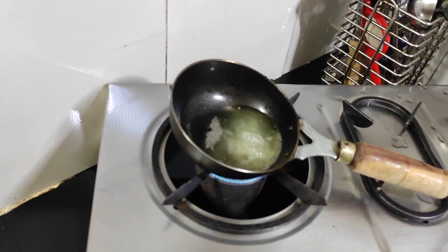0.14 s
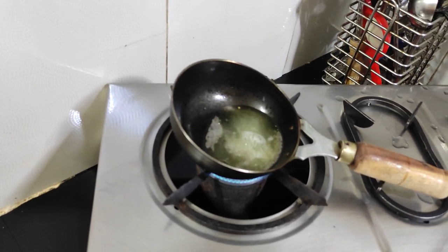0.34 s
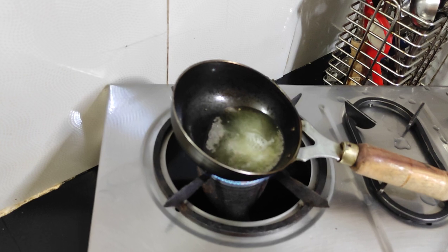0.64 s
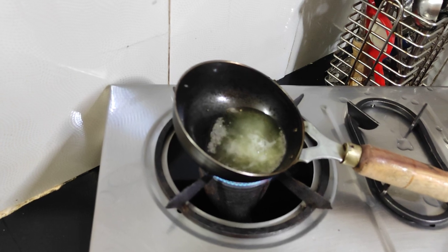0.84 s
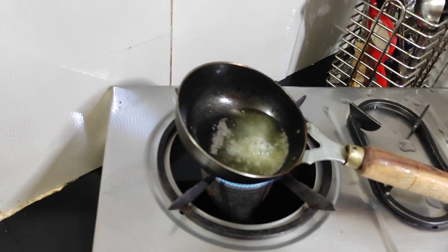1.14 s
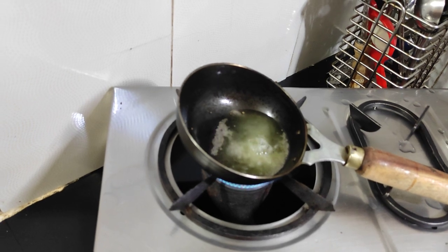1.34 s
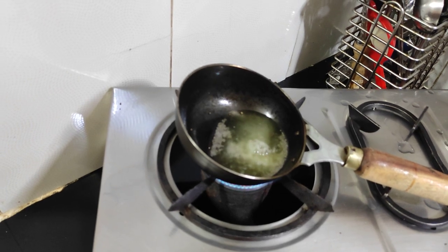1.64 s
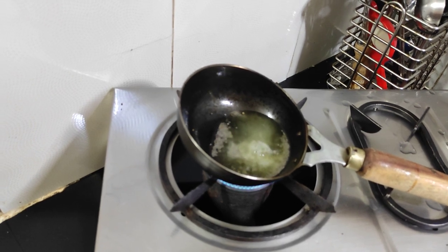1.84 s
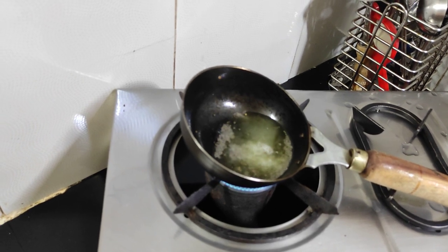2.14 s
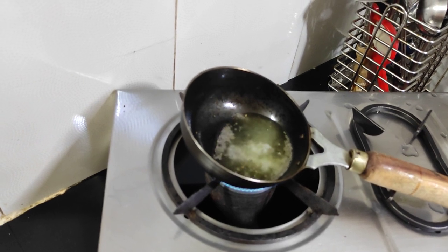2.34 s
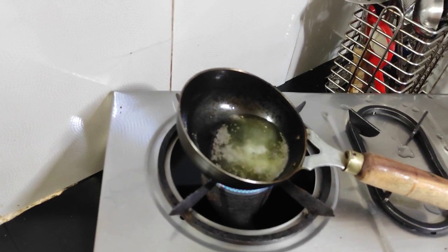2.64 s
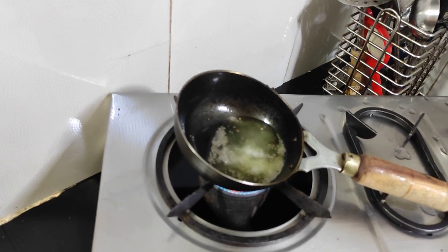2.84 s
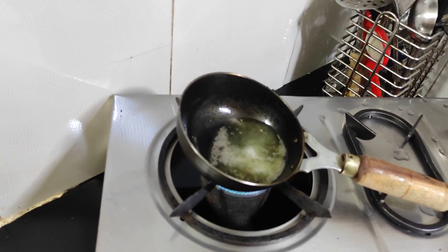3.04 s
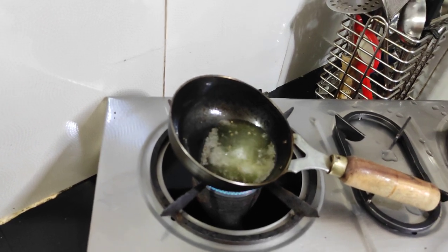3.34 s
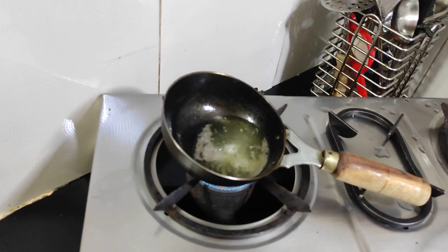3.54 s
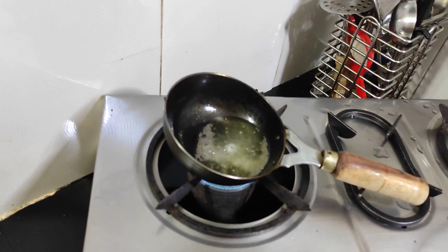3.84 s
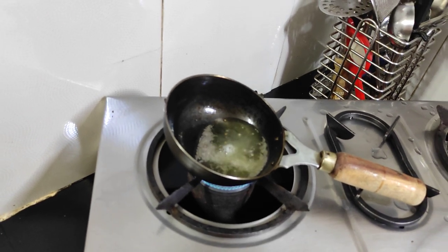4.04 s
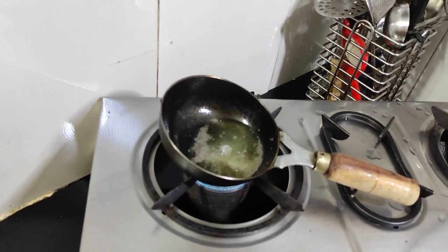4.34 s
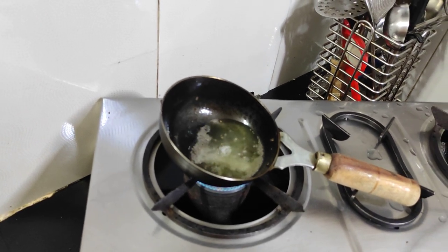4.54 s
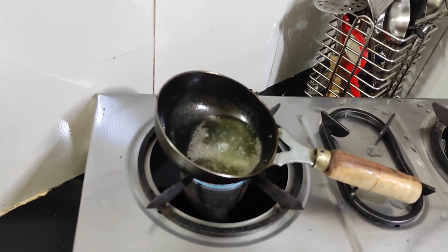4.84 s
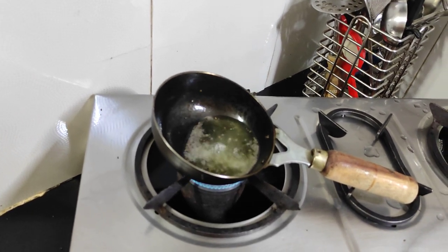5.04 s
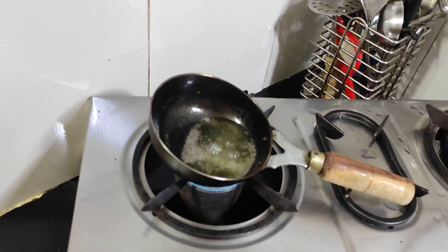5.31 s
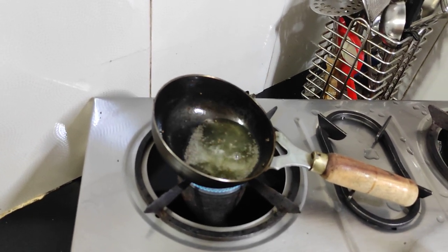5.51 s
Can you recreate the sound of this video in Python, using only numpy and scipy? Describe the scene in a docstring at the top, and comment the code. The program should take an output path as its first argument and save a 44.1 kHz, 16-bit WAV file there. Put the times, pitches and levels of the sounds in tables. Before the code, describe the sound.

Close stereo recording of seeds bursting in a small pan of hot oil on a gas burner. Sharp dry snaps come sparsely at first, then mix with duller, wet, pitched pops and crowd together toward the end. Quiet fizz grows beneath, with a soft steady flame rush. Tiled walls return short, bright reflections.

```python
"""Seeds bursting in hot oil

Seeds burst in a small pan on a gas burner, close to two microphones in a tiled kitchen corner.
Dry husks crack brightly: a sharp click. Moist seeds splutter: a duller click that rings a steam pocket.
Each burst is thrown back by pan, tiles and room; listed thumps are jolts of the microphones.
Fizz, made of many tiny bursts, and the flame, made of coloured noise, lie underneath."""
import sys
import numpy as np
from scipy import signal
from scipy.fft import rfft, irfft, next_fast_len
from scipy.io import wavfile

SR = 44100
rng = np.random.default_rng(int(sys.argv[2]) if len(sys.argv) > 2 else 0)


def inscribe(sig):
    """Save sig as 16-bit PCM at rate SR to the path in sys.argv[1].

    A 1-D sig is mono; a 2-D sig holds one channel per row.
    Samples are clipped to [-1, 1] before scaling.
    """
    pcm = np.round(np.clip(np.atleast_2d(sig).T, -1, 1) * 32767)
    wavfile.write(sys.argv[1], SR, pcm.astype(np.int16))


N = 250211  # length in samples

# rush of the gas flame, relative: pitch_hz, level_db
FLAME_COLOUR = [(20, -1), (45, -1.5), (80, -1), (140, -1), (290, -6.5), (380, -3.5), (520, -6),
                (650, -10.5), (1000, -10.5), (2000, -17.5), (6000, -24), (13500, -26), (15000, -57)]
# resonances of the burner and the hollow hob: pitch_hz, width_hz, level_db
BURNER_MODES = [(115.4, 3.1, 9), (203.4, 15, -2.5), (283, 13.3, 6.5), (380, 27, -17.5), (498.4, 2.8, 10.5),
                (673, 9.8, 1.5)]
# kitchen reverberation: band_hz, level_db, time_to_fall_60_db_s
KITCHEN_BANDS = [(300, -14.5, 1), (1620, -2.5, 0.4), (2700, -3.5, 0.44), (5460, -4, 0.37),
                 (8800, -7.5, 0.38), (14000, -6, 0.27)]
# jolts that overload the microphones, before a shared gain: start_s, left_db, right_db
MIC_THUMPS = [(0.2226, -29, -37), (0.5513, -30.5, -37), (0.9881, -32, -46), (1.1639, -18.5, -4.5),
              (1.2774, -21.5, -28), (1.4931, -21, -46), (1.7702, -21, -35), (2.347, -30, -49),
              (2.735, -17, -38), (3.062, -32, -40), (3.8943, -27, -36), (4.2633, -29.5, -38),
              (5.6338, -18.5, -35)]
# right microphone minus left: pitch_hz, difference_db
RIGHT_MINUS_LEFT = [(900, 3.5), (1800, 2), (3000, 3.5), (4400, 1.5), (6000, 5), (7100, 4), (8400, -4),
                    (9500, -4), (11500, 1), (14000, 0)]
# faint modes of the oil-damped pan: pitch_hz, width_hz, level_db
PAN_RESONANCES = [(1443, 45, -7), (1848, 45, -4), (2464, 160, -11), (2810, 45, -13.5), (6770, 120, -4)]
# basic colour of a burst: pitch_hz, level_db
BURST_COLOUR = [(150, -20), (600, -22), (900, -17), (1300, -10.5), (2200, -11.5), (3200, -5), (4800, -4.5),
                (7000, -2), (8700, 0), (10500, -5), (12500, -8.5), (14200, -11), (15500, -42)]
# echoes from hob and tiles, before treble loss: delay_s, left_db, right_db
TILE_ECHOES = [(.0024, -4, -14), (.0038, -21, -11.5), (.0083, -21.5, -14.5)]
# dry husks that crack at the surface: start_s, level_db, brightness_db_per_octave
DRY_CRACKS = [(-.02, 2.5, -1), (0.2227, 0.5, 0), (0.3377, -3.5, -0.5), (0.5514, -2, 1), (0.5794, -1.5, 0),
              (.9881, 3.5, 0.5), (1.1654, 5.5, 0), (1.2767, 6.5, 0.5), (1.4931, -0.5, -1), (1.7708, 3.5, 1),
              (1.8423, 4.5, 0), (1.849, -4, -2), (1.9796, 3, -1), (2.347, -1, 0), (2.4284, -0.5, -1),
              (2.6811, 4.5, -1), (2.7353, -0.5, 1.5), (2.7873, 2.5, 1), (3.062, 2.5, 1),
              (3.1924, -8.5, 2.5), (3.2472, -0.5, 2.5), (3.3055, -5, 1.5), (3.5845, -0.5, -1.5),
              (3.6144, -1, 1), (3.657, -3, 2), (3.702, 3, 0.5), (3.7978, -1, -1.5), (3.969, -3, -0.5),
              (4.022, -7, 1), (4.1003, -9.5, -2.5), (4.2634, -1.5, 0.5), (4.3157, -2, -0.5),
              (4.3854, -4, -1), (4.4089, -9, -3), (4.4246, -1.5, -0.5), (4.5075, -4.5, -1.5),
              (4.5855, 2, 0), (4.73, -2, 2.5), (4.8267, 1.5, 3), (4.8472, -3.5, 2), (4.9524, -7.5, -1),
              (4.995, 3, -1), (5.236, 1.5, -0.5), (5.336, 2, -1), (5.4218, -3.5, -3), (5.441, -3, 1),
              (5.5104, 2, -1.5), (5.519, 3.5, -0.5)]
# moist seeds that splutter under the oil: start_s, level_db, pocket_hz, ring_db
MOIST_SPLUTTERS = [(.4432, -19, 4750, 2), (0.482, -8, 5600, 1), (0.6952, -0.5, 7500, 14.5),
                   (0.7165, 0.5, 4240, -5), (0.8332, .5, 6200, 1.5), (0.879, -12, 3330, -11),
                   (1.357, -4.5, 8600, 5.5), (1.6118, -14, 5700, 30), (1.8915, -1, 6700, 5),
                   (2.0601, 6.5, 6450, 1), (2.0682, -5, 7050, 9), (2.1489, -1, 7000, 0),
                   (2.2979, -12.5, 3270, 4), (2.4179, -3.5, 4060, 9), (2.5023, -0.5, 3430, 16),
                   (2.5836, -10.5, 6360, -1), (2.7538, 3.5, 2970, 7.5), (2.912, -11, 3530, 11),
                   (2.9399, -4.5, 7100, 8), (3.132, -8.5, 4140, 1), (3.2091, -2.5, 3460, 15),
                   (3.276, -8, 3460, 3), (3.373, 2, 2900, 13), (3.5518, 2.5, 2560, 25),
                   (3.8943, 3, 9900, 7), (4.3977, -1, 6630, -8), (4.4746, -1.5, 2630, 13),
                   (4.5615, -1.5, 4230, 4), (4.571, -1, 3400, 6), (4.6073, 0.5, 4200, 27),
                   (4.629, 2, 6540, 5), (4.6416, 5.5, 9050, 4), (4.6514, 0.5, 9200, -8),
                   (4.7418, 0.5, 3930, 3), (4.789, -9, 3600, 4), (4.9191, -8, 5300, 5),
                   (4.9978, -0.5, 6850, 17), (5.0329, 1.5, 2630, 20), (5.1252, -2.5, 2850, 5),
                   (5.216, -2, 5430, 22), (5.221, 4.5, 3120, 11), (5.3147, -2.5, 2270, 1),
                   (5.493, -7, 4800, 10), (5.558, 0, 5400, 16), (5.5747, -2.5, 2920, 19),
                   (5.6326, -3, 9900, 7)]

FLAME_DB = -52.5  # rms
TOP_HZ = 15800  # upper limit of the whole sound
SIZE = 1024  # samples in one burst
LEAD = 4410  # samples of run-up before the scene begins
# share of a burst that scatters in the oil and off the pan wall
PAN_WALL_DB = -2.8
# a crack rings only faintly, at a pitch of its own
CRACK_POCKET_HZ, CRACK_POCKET_OCTAVES, CRACK_RING_DB = 6440, 0.48, -10
# oil muffles a splutter, the more so the more it rings
OIL_DB_PER_OCTAVE, OIL_DB_PER_OCTAVE_PER_RING_DB = -3, -0.09
# the seeds lie scattered over the pan, a little to the left (left minus right)
PAN_DB, PAN_SPREAD_DB = 1.55, 0.67
# where treble rolls off, in the open and under oil; brightness tilts it from the knee up
OPEN_TOP_HZ, OIL_TOP_HZ, KNEE_HZ = 16700, 11200, 2310


def undb(db):
    """Turn decibels into gain."""
    return 10 ** (np.asarray(db) / 20)


def level(x, db):
    """Set the rms level, a measure of average strength."""
    return x * undb(db) / np.sqrt(np.mean(x ** 2))


def freqs(size):
    """List the frequencies of a transform in Hz, never below 1."""
    return np.maximum(np.fft.rfftfreq(size, 1 / SR), 1)


def colour(points, f):
    """Join (Hz, dB) points with lines on a log-frequency axis."""
    hz, db = np.transpose(points)
    return np.interp(np.log(f), np.log(hz), db)


def causal(db):
    """Find the quickest response with this gain curve: a sharp front, then a tail."""
    cepstrum = irfft(np.log(undb(db)))
    half = len(cepstrum) // 2
    # fold the backward half onto the forward half
    cepstrum[1:half] *= 2
    cepstrum[half + 1:] = 0
    return np.exp(rfft(cepstrum))


def resonance(f, hz, q):
    """Response of one damped resonance, gain 1 at its centre; higher q rings longer."""
    return 1 / (1 + 1j * q * (f / hz - hz / f))


def ringing_body(f, modes):
    """An object passes the sound straight on and adds its own resonances."""
    return 1 + sum(undb(db) * resonance(f, hz, hz / width) for hz, width, db in modes)


def add(track, s, sound):
    """Mix a stereo sound into a track that starts LEAD samples early."""
    start = max(int(round(s * SR)) + LEAD, 0)
    part = track[:, start:start + sound.shape[1]]
    part += sound[:, :part.shape[1]]


def flame(alike_hz=750, bass_likeness=0.64):
    """The steady rush of the flame rings the burner; its bass is more alike in both microphones."""
    f = freqs(N)
    body = ringing_body(f, BURNER_MODES)
    likeness = min(bass_likeness, .98) / (1 + (f / alike_hz) ** 4)
    noise = rfft(rng.standard_normal((2, N)))
    # mid is shared by both sides; side has opposite signs
    mid, side = noise * np.sqrt([1 + likeness, 1 - likeness])
    stereo = mid + np.array([[1], [-1]]) * side
    rush = irfft(stereo * body * undb(colour(FLAME_COLOUR, f)), N)
    return level(rush, FLAME_DB)


def kitchen(x, early_db=-10, early_s=0.0013, far_wall_db=-12, far_wall_s=0.027, far_decay_s=0.0049):
    """Scatter from the nearby corner, a cluster from the far walls, then a tail of tiled walls."""
    size = int(.7 * SR)
    t, f = np.arange(size) / SR, freqs(size)
    hz, db, t60 = np.transpose(KITCHEN_BANDS)

    def cloud(start_s, decay_s):
        """Power of a swarm of echoes, summing to 1."""
        power = np.exp(-2 * t / decay_s) * (t > start_s)
        return power / power.sum()

    corner = undb(early_db) ** 2 * cloud(0.00082, early_s)
    far_walls = undb(far_wall_db) ** 2 * cloud(far_wall_s, far_decay_s)
    clusters = corner + far_walls
    noise, response = rfft(rng.standard_normal((2, size))), 0
    # each row of the identity matrix picks out one band
    for k, share in enumerate(np.eye(len(hz))):
        band = irfft(noise * np.interp(np.log(f), np.log(hz), share), size)
        tail = cloud(0.0036, t60[k] / np.log(1000))
        response = response + band * undb(db[k]) * np.sqrt(clusters + tail)
    return signal.fftconvolve(x, response, axes=1)[:, :x.shape[1]]


def fizz(count=400, start_db=-43, end_db=-32.0, spread_db=5.5, bright=-0.55, top_hz=11500, ring_db=8):
    """Tiny steam bubbles break as little bursts, more strongly as the seeds heat up."""
    track = np.zeros((2, LEAD + N))
    for when, size, pitch in rng.random((count, 3)):
        growing_db = start_db + (end_db - start_db) * when
        # most bubbles are weak, a few much stronger
        db = growing_db - spread_db * np.log(max(size, .03))
        pocket_hz = 2500 * 4 ** pitch
        add(track, when * N / SR, burst(db, bright, top_hz, pocket_hz, ring_db, 0))
    return track


def rumble(x, rumble_db=-12, rumble_hz=65, fade_s=0.12):
    """A thump leaves a brief low rumble: fading noise with its treble removed."""
    t = np.arange(8 * SIZE) / SR
    tail = rng.standard_normal((2, len(t))) * np.exp(-t / fade_s) * (t > .018)
    # the level is set before the low-pass filter
    tail = undb(rumble_db) * tail / np.linalg.norm(tail, axis=1, keepdims=True)
    tail = signal.sosfilt(signal.butter(3, rumble_hz, fs=SR, output="sos"), tail)
    return signal.fftconvolve(x, tail, axes=1)[:, :x.shape[1]]


def thumps(left_recover_s=0.0035, right_recover_s=0.0017, left_bass_hz=6, right_bass_hz=38,
           rise_s=.00006, jolt_db=-3, gain_db=1.0):
    """A jolt pushes a microphone one way, then off centre the other; it creeps back in milliseconds."""
    track, t = np.zeros((2, LEAD + N)), np.arange(4 * SIZE) / SR
    jolt_s = .0002
    after = np.maximum(t - jolt_s, 0)
    jolt = undb(jolt_db) * np.sin(np.pi * np.minimum(t / jolt_s, 1))
    kicks = []
    for recover_s, bass_hz in (left_recover_s, left_bass_hz), (right_recover_s, right_bass_hz):
        kick = jolt + np.exp(-after / rise_s) - np.exp(-after / recover_s)
        bass_cut = signal.butter(1, bass_hz, "high", fs=SR, output="sos")
        kicks.append(signal.sosfilt(bass_cut, kick))
    for s, left_db, right_db in MIC_THUMPS:
        add(track, s, undb([[left_db], [right_db]]) * undb(gain_db) * np.array(kicks))
    return track


def microphones(x):
    """The two microphone ports colour the sound in opposite ways."""
    half_db = colour(RIGHT_MINUS_LEFT, freqs(SIZE)) / 2
    response = irfft(np.array([causal(-half_db), causal(half_db)]))
    return signal.fftconvolve(x, response, axes=1)[:, :x.shape[1]]


def pan_ring(x):
    """Every burst sets the pan ringing faintly at its own resonances."""
    size = next_fast_len(x.shape[1] + LEAD)
    body = ringing_body(freqs(size), PAN_RESONANCES)
    return irfft(rfft(x, size) * body, size)[:, :x.shape[1]]


def burst(db, bright, top_hz, pocket_hz, ring_db, pan_db, pocket_q=3.9, depth_db=0.24,
          pan_decay_s=0.0026, wander_s=0.0002025, echo_hz=9000):
    """One seed: the husk cracks, the steam pocket rings, pan and tiles throw the sound back."""
    f, t = freqs(SIZE), np.arange(SIZE) / SR
    husk_db = colour(BURST_COLOUR, f)
    muffle_db = 10 * np.log10(1 + (f / top_hz) ** 8)
    tilt_db = bright * np.log2(np.maximum(f / KNEE_HZ, 1))
    crack = causal(husk_db + tilt_db - muffle_db)
    source = crack * (1 + undb(ring_db) * resonance(f, pocket_hz, pocket_q))
    # crack and ring share the energy of the burst
    source = source * np.linalg.norm(undb(db + husk_db)) / np.linalg.norm(source)
    # every seed lies somewhere else, so the few sharp reflections off the pan wall are its own
    bowl = rng.standard_normal((2, SIZE)) ** 3 * np.exp(-t / pan_decay_s) * (t > .00018)
    bowl = bowl / np.linalg.norm(bowl, axis=1, keepdims=True)
    # bright seeds snap cleanly at the surface; dull ones lie deeper and scatter more
    scatter_db = min(PAN_WALL_DB - depth_db * bright, 0)
    paths = 1 + undb(scatter_db) * rfft(bowl)
    tiles = 1
    for delay, left_db, right_db in TILE_ECHOES:
        lag = delay + wander_s * rng.standard_normal((2, 1))
        echo = undb([[left_db], [right_db]]) * np.exp(-2j * np.pi * f * lag)
        tiles = tiles + echo / (1 + 1j * f / echo_hz)
    # the right microphone is usually slightly nearer, depending on where the seed lies
    late_s = np.array([[rng.normal(.00004, .000022)], [0]])
    balance = undb(np.array([[pan_db], [-pan_db]]) / 2)
    ports = balance * np.exp(-2j * np.pi * f * late_s)
    # a few samples of lead keep the front of the click whole
    return np.roll(irfft(source * paths * tiles * ports), 8, axis=1)


def cracks():
    """Dry husks snap, each at its own place in the pan: a list of (start_s, sound, ring_db)."""
    out = []
    for s, db, bright in DRY_CRACKS:
        pitch, place = rng.standard_normal(2)
        pocket_hz = CRACK_POCKET_HZ * 2 ** (CRACK_POCKET_OCTAVES * pitch)
        pan_db = PAN_DB + PAN_SPREAD_DB * place
        sound = burst(db, bright, OPEN_TOP_HZ, pocket_hz, CRACK_RING_DB, pan_db)
        out.append((s, sound, CRACK_RING_DB))
    return out


def splutters():
    """Moist seeds burst under oil, duller and at a set pitch: a list of (start_s, sound, ring_db)."""
    out = []
    for s, db, pocket_hz, ring_db in MOIST_SPLUTTERS:
        bright = OIL_DB_PER_OCTAVE + OIL_DB_PER_OCTAVE_PER_RING_DB * ring_db
        pan_db = PAN_DB + PAN_SPREAD_DB * rng.standard_normal()
        sound = burst(db, bright, OIL_TOP_HZ, pocket_hz, ring_db, pan_db)
        out.append((s, sound, ring_db))
    return out


def seeds(count=4, dryness=0.14):
    """The bursts are shared among a few spots in the pan; each spot stirs the room in its own way."""
    direct, spots = np.zeros((2, LEAD + N)), np.zeros((count, 2, LEAD + N))
    for k, (s, sound, ring_db) in enumerate(cracks() + splutters()):
        add(direct, s, sound)
        # ringing pops send less into the room than sharp cracks
        add(spots[k % count], s, sound * undb(-dryness * max(ring_db, 0)))
    return direct + sum(kitchen(spot) for spot in spots)


def scene():
    """The pan in its room, over the flame, with the microphone thumps."""
    burner, bubbles, knocks = flame(), fizz(), thumps()
    pan = microphones(pan_ring(seeds() + bubbles + kitchen(bubbles)))
    return (pan + knocks + rumble(knocks))[:, LEAD:] + burner


def record(dry):
    """A steep low-pass filter removes nearly everything above TOP_HZ."""
    return signal.sosfilt(signal.ellip(8, .2, 70, TOP_HZ, fs=SR, output="sos"), dry)


dry = scene()
out = record(dry)
inscribe(out)
```